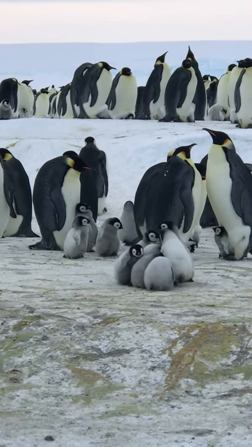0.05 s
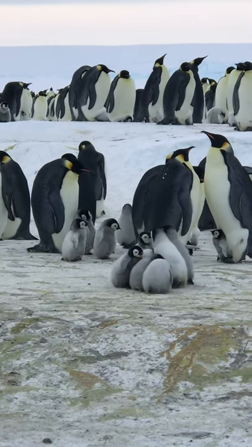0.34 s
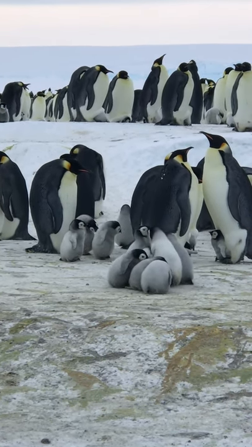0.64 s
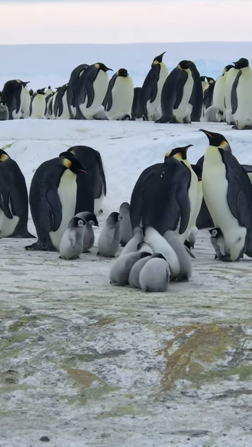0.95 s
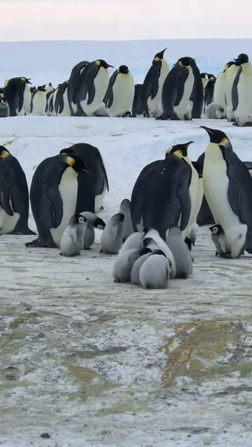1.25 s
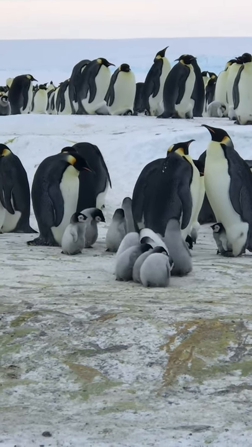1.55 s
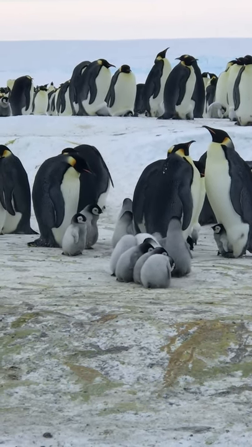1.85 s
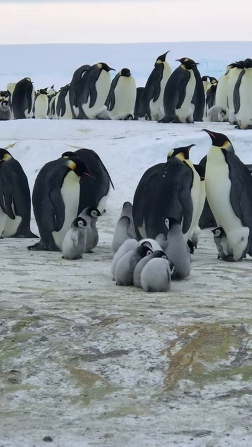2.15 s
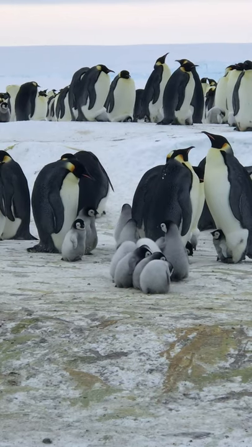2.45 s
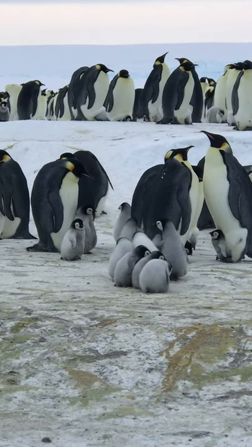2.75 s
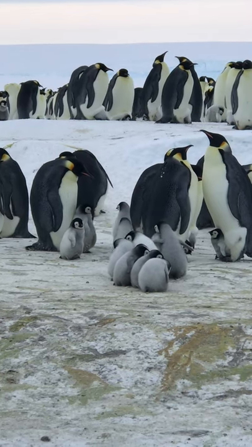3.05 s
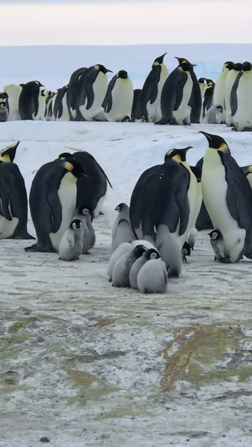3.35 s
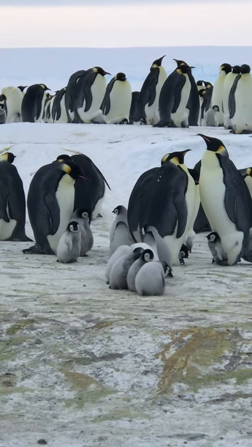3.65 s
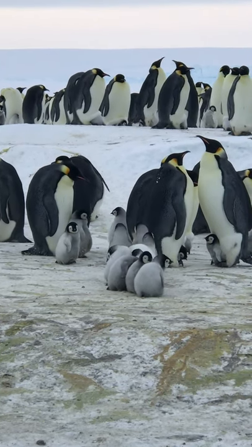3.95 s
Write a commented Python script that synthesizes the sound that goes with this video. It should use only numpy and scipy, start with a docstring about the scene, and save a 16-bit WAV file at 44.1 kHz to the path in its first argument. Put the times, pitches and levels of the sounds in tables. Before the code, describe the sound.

Penguin chicks peep and whistle close by, with a distant colony and wind on the microphone.

```python
"""Penguin chicks on open ice

Close to the microphone, chicks whistle quick scooped and arched peeps, shaped by throat and beak,
and end their calls on a long falling note. Further off, the colony blends into a twittering wash,
and feet scuff the snow. Wind eddies rumble on the microphone and buffet it hard near the end."""
import sys
import numpy as np
from scipy import signal
from scipy.fft import rfft, irfft
from scipy.io import wavfile
from scipy.ndimage import uniform_filter1d

SR = 44100
rng = np.random.default_rng(int(sys.argv[2]) if len(sys.argv) > 2 else 0)


def output_pcm(signal):
    """Save a mono or channel-first signal as 16-bit PCM at the path in sys.argv[1].

    Samples are clipped to [-1, 1] before scaling.
    """
    pcm = np.clip(np.atleast_2d(signal).T, -1, 1) * 32767
    wavfile.write(sys.argv[1], SR, np.round(pcm).astype(np.int16))


N = 176400


# Scooped peeps close by, levels before the throat: (start [s], length [s], first pitch [Hz],
# middle pitch [Hz], last pitch [Hz], level [dB], overtones [dB])
SCOOPED_PEEPS = [(0.238, 0.033, 2428, 2010, 1850, -32.5, -5.5), (0.33, 0.056, 2600, 1823, 2550, -36, -5),
                 (0.403, 0.031, 2794, 2154, 1680, -35.5, -7), (.47, 0.044, 2403, 2130, 1890, -33, -9),
                 (0.891, 0.043, 3230, 2670, 2390, -37, -10), (1.048, 0.027, 3260, 2560, 2200, -37.5, -18),
                 (1.088, .05, 2305, 1800, 2100, -42, -26), (1.22, 0.048, 2930, 1945, 2420, -42, -5),
                 (1.278, 0.04, 2500, 2020, 2400, -30, -15), (1.334, 0.056, 2987, 1945, 2160, -33.5, 2),
                 (1.379, 0.038, 2165, 1900, 2400, -35, -2), (1.44, .04, 2890, 2100, 2000, -34.5, 2),
                 (1.477, 0.11, 2274, 1790, 2310, -32.5, -2), (2.185, 0.042, 2395, 2040, 2650, -35, -2),
                 (2.287, .065, 2760, 1997, 2900, -36.5, 11), (2.43, .108, 2810, 1933, 2770, -29.5, -4),
                 (3.011, 0.026, 2630, 2327, 1950, -35, 6), (3.13, .067, 2550, 2038, 2380, -35, 3),
                 (3.249, 0.074, 2444, 2060, 2860, -34.5, 6), (3.403, 0.1, 2850, 1990, 2760, -33, -4.5),
                 (3.95, 0.024, 2566, 2250, 1966, -37, 6)]
def near_scoops(flick_s=.006, flick_drop=.206, edge_bright_db=12.5):
    """Peeps that sag in pitch; the voice flicks up into each and down out of it, bright with strain."""
    out = np.zeros(N)
    flick = 1 - flick_drop * np.linspace(0, 1, int(flick_s * SR)) ** 2
    for start, length, first, middle, last, db, overtones_db in SCOOPED_PEEPS:
        hz = bend(length, first, middle, last, power=3)
        hz = np.concatenate([hz[0] * flick[::-1], hz, hz[-1] * flick])
        edges = np.linspace(-1, 1, len(hz)) ** 4
        add(out, start - flick_s, undb(db) * whistle(hz, overtones_db, edge_bright_db * edges, partials=3))
    return out


# Arched peeps close by, levels before the throat: (start [s], length [s], first pitch [Hz],
# middle pitch [Hz], last pitch [Hz], level [dB], overtones [dB])
ARCHED_PEEPS = [(0.013, 0.044, 1930, 2470, 2380, -32, 13), (0.118, 0.013, 2320, 2480, 2120, -25.5, 6.5),
                (.537, 0.06, 1970, 2560, 1870, -32.5, -14), (.686, .028, 2400, 2820, 2500, -52.5, 26),
                (.972, 0.082, 1740, 2200, 1370, -50, 9.5), (1.125, 0.052, 1874, 2280, 2330, -34.5, -21),
                (1.516, .06, 2265, 2660, 2400, -38.5, 2), (1.596, 0.062, 1788, 2130, 1760, -33, -2),
                (1.85, .09, 2110, 2170, 2550, -36.5, -9), (2.73, 0.1, 1960, 2160, 2450, -39.5, 3.5),
                (2.915, 0.035, 2335, 2440, 2560, -31.5, -3), (3.068, 0.073, 2080, 2340, 2153, -33.5, -5),
                (3.812, 0.087, 2344, 2390, 2550, -38.5, -2)]
def near_arches():
    """Peeps that rise, then tip over or climb on."""
    out = np.zeros(N)
    for start, length, first, middle, last, db, overtones_db in ARCHED_PEEPS:
        hz = bend(length, first, middle, last)
        add(out, start, undb(db) * whistle(hz, overtones_db, partials=6))
    return out


# Call endings close by, levels before the throat:
# (start [s], length [s], pitch [Hz], level [dB], overtones [dB])
CLOSING_NOTES = [(1.619, 0.13, 1667, -28.5, -26), (2.57, .14, 1825, -28.5, -16),
                 (3.54, .15, 1916, -31, -11.5)]
def near_closers():
    """The long falling whistle that ends a near chick's call."""
    out = np.zeros(N)
    for start, length, hz, db, overtones_db in CLOSING_NOTES:
        add(out, start, undb(db) * whistle(falling_pitch(length, hz), overtones_db))
    return out


# Glide of a closing note: (time [share of the note], pitch [ratio])
CLOSING_GLIDE = [(0, 1.29), (.16, 1.06), (.38, .988), (0.659, 1.012), (0.83, .94), (1.002, .8)]
def falling_pitch(length, hz):
    """Pitch that drops, holds and falls away."""
    share, ratio = np.array(CLOSING_GLIDE).T
    size = int(length * SR)
    glide = np.interp(np.linspace(0, 1, size), share, ratio)
    return hz * uniform_filter1d(glide, size // 7, mode="nearest")


def bend(length, first, middle, last, power=1.7):
    """Pitch that bends through a middle value, steepest at both ends."""
    u = np.linspace(-1, 1, int(length * SR))
    return middle + np.where(u < 0, first - middle, last - middle) * np.abs(u) ** power


# Resonances of a chick's throat and beak: (frequency [Hz], gain [dB])
THROAT_RESPONSE = [(1100, -26), (1600, -9), (2000, -2.5), (2550, -6), (3100, -14), (3900, -16),
                   (4800, -25.5), (5600, -22), (6700, -31.5), (8600, -33), (10500, -36.5), (12300, -33),
                   (15500, -48)]
def whistle(hz, overtones_db, octave_db=0, partials=4, jitter=.008, rasp=.063):
    """A chick's voice: a few wavering partials, shaped by throat and beak."""
    size = len(hz)
    u = np.linspace(0, 1, size)
    unsteady = jitter + rasp * np.abs(2 * u - 1) ** 6.8  # the pitch breaks up towards both ends
    phase = 2 * np.pi * np.cumsum(hz * (1 + unsteady * walk(2000, size))) / SR
    tone = colour(THROAT_RESPONSE, hz) * np.sin(phase)
    for k in range(2, partials + 1):
        waver_db = 3 * walk(172, size)
        db = overtones_db * np.sqrt(k - 1) / 2 + (k == 2) * octave_db + waver_db
        tone += undb(db) * colour(THROAT_RESPONSE, k * hz) * (k * hz < SR / 2) * np.sin(k * phase)
    swell = np.clip(np.minimum(u, 1 - u) / .16, 0, 1)
    shimmer = undb(2 * walk(164, size))
    return np.sqrt(2 * swell) * tone * shimmer


def colony_calls(calls_per_s=8, note_s=.052, gap_s=.05, bend_depth=.38):
    """Many chicks, each calling three bent notes and a closing note at its own pitch."""
    out = np.zeros(N)
    for n in range(int(calls_per_s * 4.5)):
        timing, voice, strength = rng.standard_normal(3)
        start = (n + timing / 2) / calls_per_s - .5
        hz = 2060 * np.exp(.13 * voice)
        gain = undb(1.5 * np.tanh(strength))
        for stretch, lift, kind, ending in rng.random((3, 4)):
            length = note_s * (.5 + stretch)
            high = hz * (1 + bend_depth * (.5 + lift))
            last = hz * (1 + bend_depth * (2 * ending - .5))
            pitch = bend(length, high, hz, last) if kind < .7 else bend(length, hz, high, hz)
            add(out, start, gain * whistle(pitch, overtones_db=0, octave_db=-1))
            start += length + gap_s
        add(out, start, gain * whistle(falling_pitch(2 * note_s, hz), overtones_db=0, octave_db=-1))
    return unit(out)


# The colony as it reaches the microphone from further off: (time [s], level [dB])
COLONY_LEVEL = [(0, -40), (.45, -40.5), (.78, -49), (.95, -43), (1.55, -38), (1.82, -50.5), (2.2, -35),
                (2.55, -40.5), (3.1, -41), (3.36, -49.5), (4, -44)]
def colony(echo_db=-20.5, echo_t60_s=.14):
    """The twittering crowd, blurred by short diffuse reflections from ice and bodies."""
    calls = colony_calls()
    t = np.arange(SR // 2) / SR
    tail = rng.standard_normal(len(t)) * undb(-60 * t / echo_t60_s)
    echo = signal.fftconvolve(calls, tail / np.linalg.norm(tail))[:N]
    return unit(calls + undb(echo_db) * echo) * undb(curve(COLONY_LEVEL))


# Wind right on the microphone, before flutter and a 3 dB lift: (time [s], level [dB])
WIND_LEVEL = [(0, -46.5), (.07, -39), (.17, -48.5), (.32, -43.5), (.35, -34.5), (.57, -39), (.63, -47),
              (.85, -50.5), (.9, -41), (1.49, -47), (1.55, -54.5), (1.63, -36.5), (1.76, -61.5), (2.1, -44),
              (2.26, -53.5), (3.275, -52), (3.32, -27.5), (3.45, -24.5), (3.57, -27), (3.61, -34),
              (3.69, -35.5), (3.72, -29.5), (4, -33)]
def wind(low_cut_hz=51.7, slope_db_per_octave=14.5):
    """Eddies on the microphone: a fluttering rumble that reaches higher as the gust grows."""
    out, power = np.zeros(N), np.zeros(N)
    gust_db = curve(WIND_LEVEL)
    flutter_db = 5 * np.tanh(walk(167.65, N))
    corner_hz = 179 * 2 ** ((gust_db + 39) / 9.5)  # an octave higher for each 9.5 dB
    for hz in 28 * 2 ** (np.arange(14) / 2):
        band = noise([(hz / 2, -70), (hz / 1.2, 0), (hz * 1.2, 0), (hz * 2, -70)], N)
        gain = 1 / np.hypot(1, undb(slope_db_per_octave * np.log2(hz / corner_hz)))
        gain /= np.hypot(1, (low_cut_hz / hz) ** 4)
        gain *= hz / np.hypot(hz, corner_hz / 7)  # strong gusts shift away from the deep bass
        out += gain * band * undb(flutter_db * min(hz / 250, 2))
        power += gain ** 2
    return out / np.sqrt(power) * undb(gust_db + 3)


# Hard knocks of wind on the microphone: (time [s], level [dB], frequency [Hz])
WIND_BUFFETS = [(.354, -15, 300), (.361, -22, 587), (0.479, -18.5, 231), (.556, -27.5, 325),
                (3.293, -13.5, 187), (3.325, -9.5, 282), (3.337, -15, 516), (3.375, -14, 340),
                (3.388, -7, 346), (3.41, -10.5, 300), (3.443, -6.5, 660), (3.454, -6, 254),
                (3.474, -10, 378), (3.5, -14, 496), (3.528, -15, 440), (3.545, -9.5, 240),
                (3.706, -14.5, 357), (3.742, -18.5, 490), (3.826, -14.5, 240), (3.9, -14, 221),
                (3.975, -13, 250)]
def buffets():
    """Single strong eddies sweep past, each a short, steep pressure swing."""
    out = np.zeros(N)
    t = np.arange(SR // 25) / SR - 1 / 50
    for centre, db, hz in WIND_BUFFETS:
        swing = np.exp(2j * np.pi * rng.random()) / (1 - 2j * np.pi * hz * t / 3) ** 4
        add(out, centre + t[0], undb(db) * swing.real)
    return out


# Faint footwork on the snow: (start [s], length [s], level [dB])
FOOT_SCUFFS = [(0.222, 0.096, -62.5), (3.04, 0.0067, -54), (3.183, .04, -53.5), (3.93, 0.015, -58)]
# Hiss of scraped snow: (frequency [Hz], gain [dB])
SNOW_SPECTRUM = [(1500, -16), (4000, 1), (9000, 1), (15000, -15)]
def scuffs():
    """Feet scrape the snow in short gritty bursts."""
    out = np.zeros(N)
    for start, length, db in FOOT_SCUFFS:
        size = int(length * SR)
        grit = noise(SNOW_SPECTRUM, size) * undb(5.6 * walk(435, size))
        add(out, start, undb(db) * unit(grit * np.hanning(size)))
    return out


# Colony and air far across the ice: (frequency [Hz], gain [dB])
FAR_SPECTRUM = [(120, -12), (200, -10.5), (345, -11), (515, -5), (700, -9), (1230, -5), (2300, -0.5),
                (2850, -9.5), (4100, -10), (5200, -20), (10400, -35.5), (12700, -35), (15500, -40.5)]
def far_wash(level_db=-42.5):
    """The farthest birds and the open air merge into a gently wavering noise."""
    return noise(FAR_SPECTRUM, N) * undb(level_db + walk(4.74, N))


def undb(db):
    """Decibels to gain."""
    return 10 ** (np.asarray(db) / 20)


def unit(x):
    """Scale to rms 1."""
    return x / (np.std(x) + 1e-12)


def curve(points):
    """Join (time [s], value) points with straight lines."""
    return np.interp(np.arange(N) / SR, *np.array(points).T)


def colour(points, hz):
    """Gain of a (frequency [Hz], gain [dB]) spectrum at the given frequencies."""
    f, db = np.array(points).T
    return undb(np.interp(np.log(hz + 1), np.log(f), db))


def noise(points, size):
    """Noise with a (frequency [Hz], gain [dB]) spectrum."""
    white = rfft(rng.standard_normal(size))
    return unit(irfft(white * colour(points, np.fft.rfftfreq(size, 1 / SR)), size))


def walk(hz, size):
    """Random wander with a spread near 1."""
    knots = 1.2 * rng.standard_normal(1024)
    return np.interp(np.arange(size) * hz / SR, np.arange(len(knots)), knots)


def add(out, start, x):
    """Mix a sound in at a time."""
    i = int(start * SR)
    a, b = max(i, 0), min(i + len(x), N)
    if b > a:
        out[a:b] += x[a - i:b - i]


def scene():
    """One microphone on the ice: chicks in front, the colony behind, wind and footwork."""
    behind = colony() + far_wash()
    near_chicks = near_scoops() + near_arches() + near_closers()
    return (near_chicks + behind + wind() + buffets() + scuffs())[None]


def record(dry):
    """The recorder cuts the deepest rumble and the top."""
    low_cut = signal.butter(2, 32, "high", fs=SR, output="sos")
    high_cut = signal.ellip(10, .2, 80, 15700, fs=SR, output="sos")
    return signal.sosfilt(high_cut, signal.sosfilt(low_cut, dry))


dry = scene()
out = record(dry)
output_pcm(out)
```